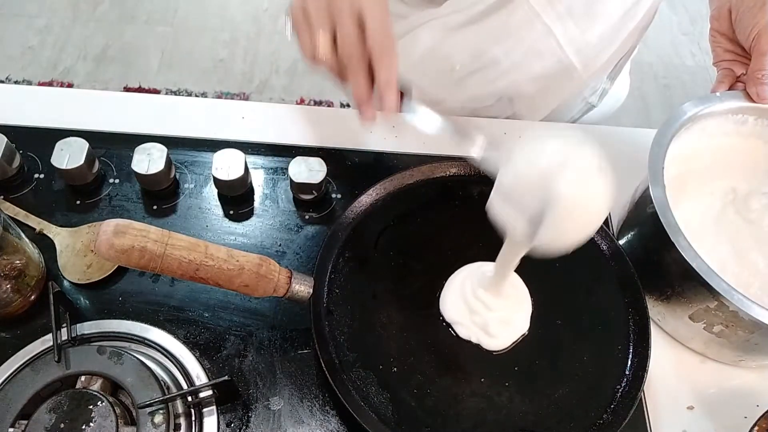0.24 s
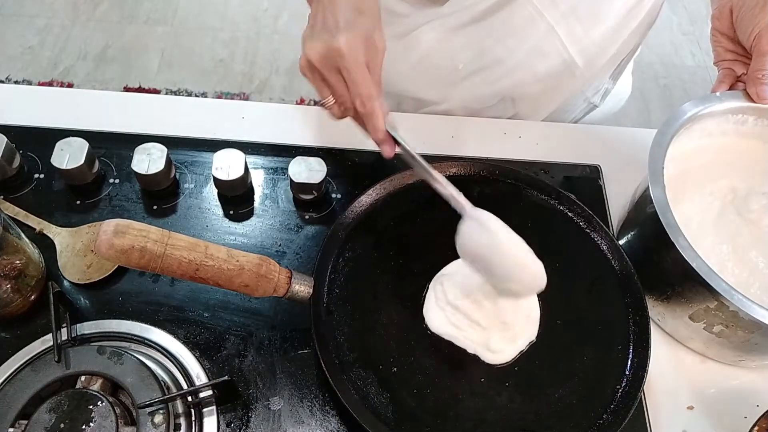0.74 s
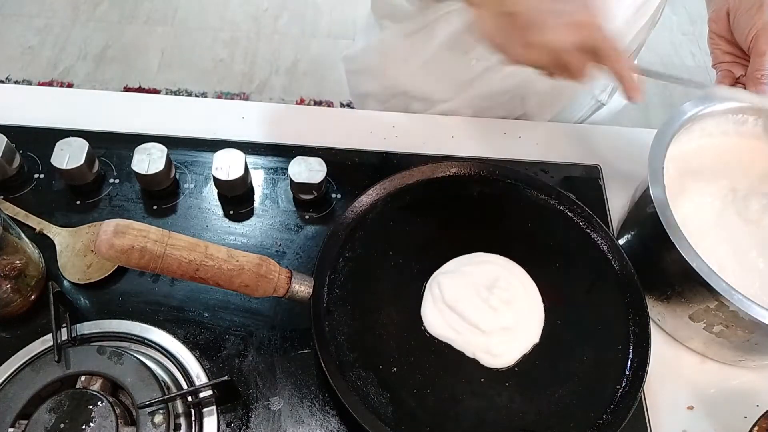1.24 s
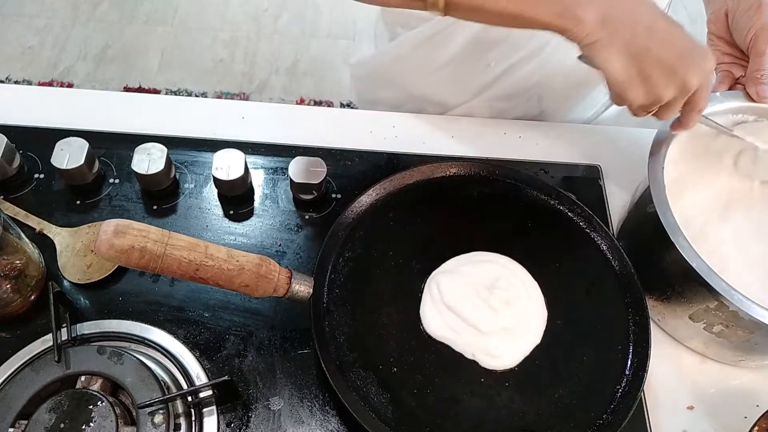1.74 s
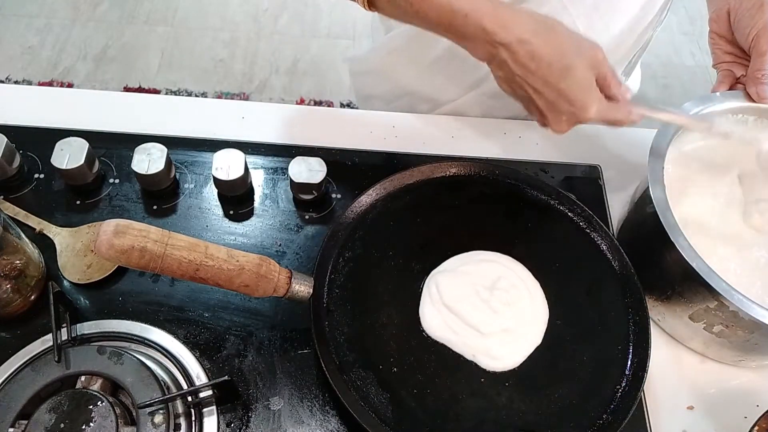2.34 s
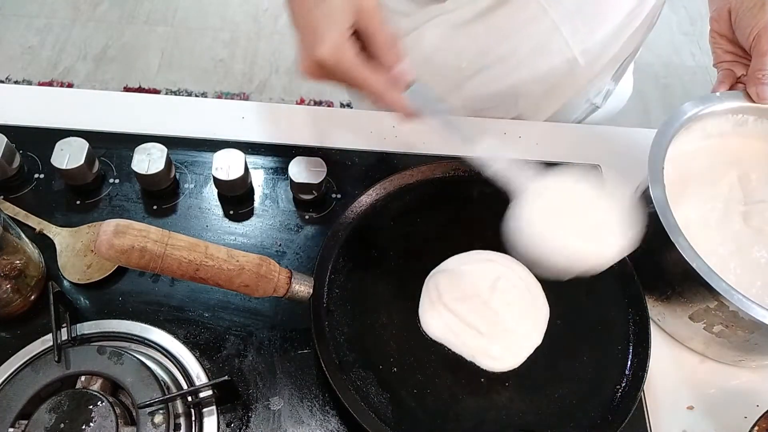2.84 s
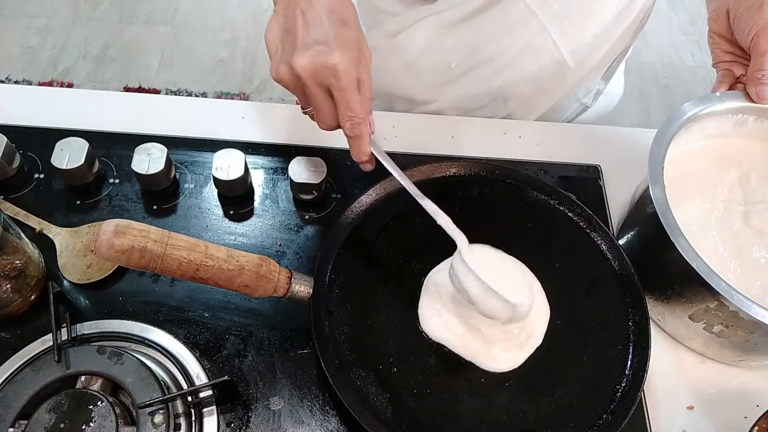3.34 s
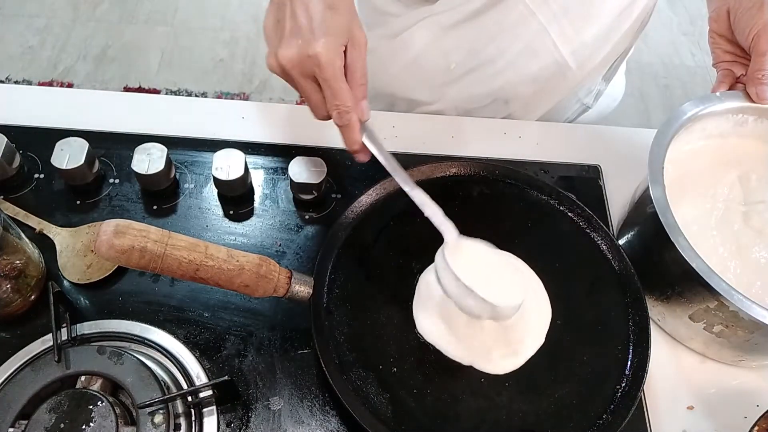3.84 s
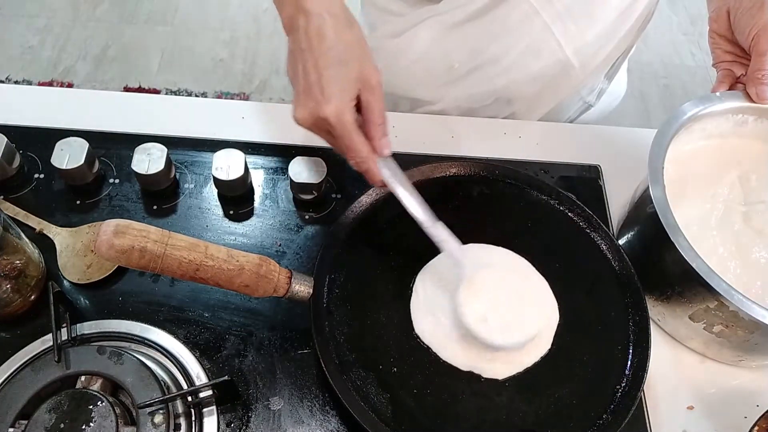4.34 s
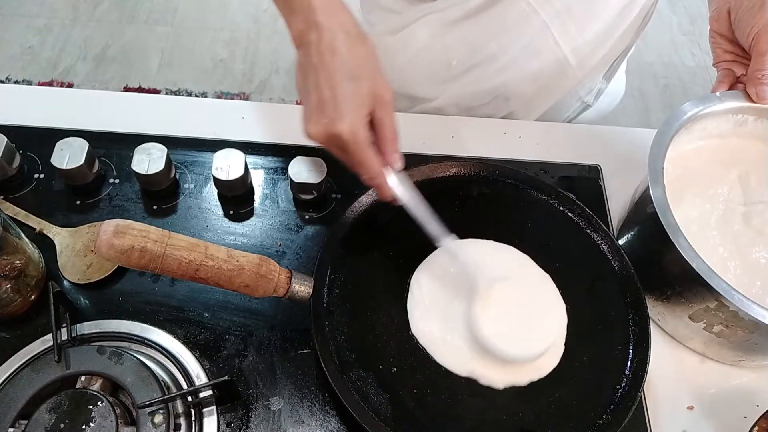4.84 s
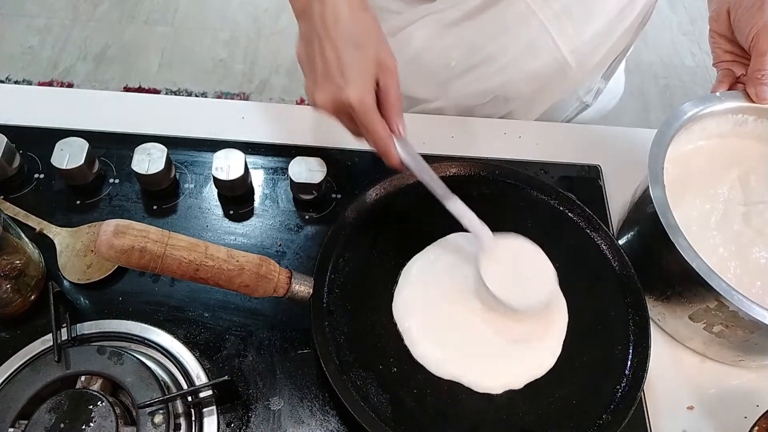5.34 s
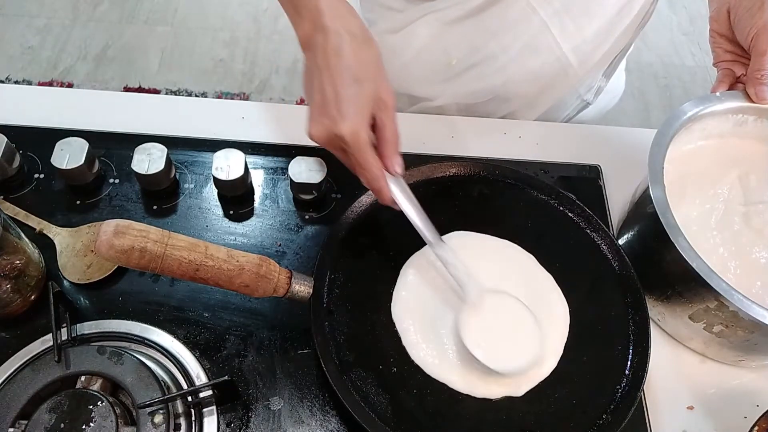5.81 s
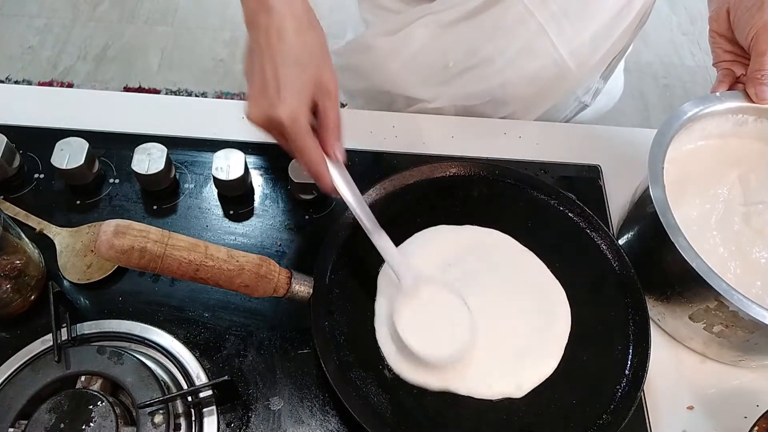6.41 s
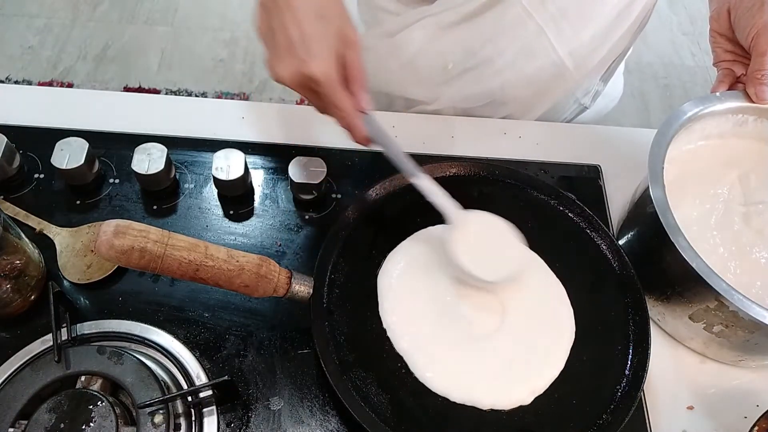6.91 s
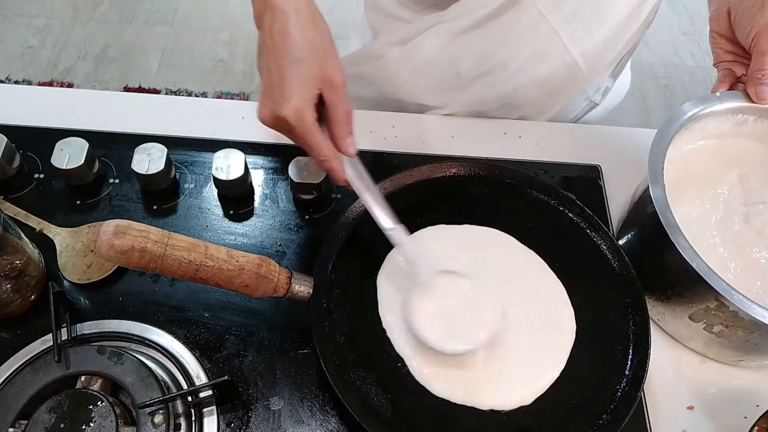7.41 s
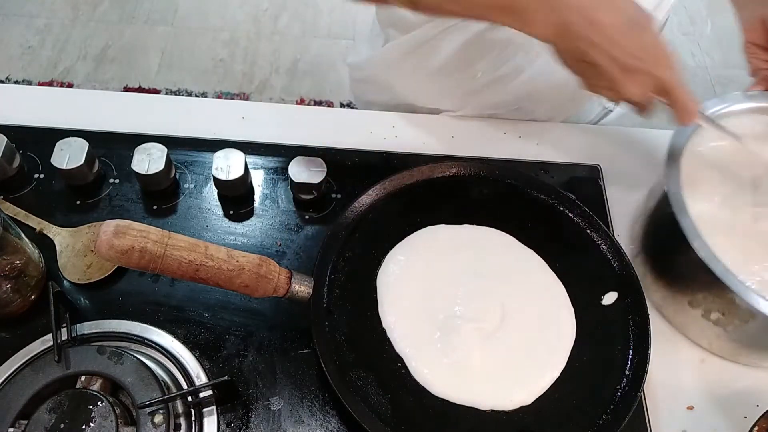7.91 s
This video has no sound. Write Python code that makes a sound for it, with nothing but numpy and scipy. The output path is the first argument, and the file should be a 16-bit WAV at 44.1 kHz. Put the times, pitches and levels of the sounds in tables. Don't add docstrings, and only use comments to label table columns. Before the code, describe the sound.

In a small kitchen, batter lands on a hot griddle. At first there is only low air rumble, a faint flame whistle and a weak fry. From about one second bright pops begin and the sizzle swells into a dense, fizzy spit with irregular crackles. A dull dip in the bowl is barely audible. At the very end the ladle clinks hard and rattles on the steel rim. Close stereo phone pickup, slightly gated highs.

```python
import sys
import numpy as np
from scipy import signal
from scipy.fft import rfft, irfft
from scipy.io import wavfile
from scipy.ndimage import uniform_filter1d

SR = 44100
rng = np.random.default_rng(int(sys.argv[2]) if len(sys.argv) > 2 else 0)


def how_loud(loudness_db):
    steps = np.asarray(loudness_db, float) / 20
    return 10 ** steps


def unload_wav(signal):
    wavfile.write(
        sys.argv[1],
        SR,
        np.round(np.clip(np.atleast_2d(signal).T, -1, 1) * 32767).astype(np.int16),
    )


N = 359856
TIME = np.arange(N) / SR
HZ = np.maximum(np.fft.rfftfreq(N, 1 / SR), 1)
LEFT_RIGHT = np.array([[1], [-1]])

# pitch in Hz, level in dB per Hz.
FRY_TONE = [(140, -59), (230, -41), (462, -18.5), (521, -9), (650, -6.5), (777, -2), (986, 1.5), (1160, -1),
            (1630, 3.5), (6220, -2), (8000, -0.5), (10400, -9.5), (17600, -120)]
# pitch in Hz, level in dB per Hz.
SPIT_TONE = [(3240, -22), (5500, -12), (5810, -7.5), (6250, -11.5), (6950, -5.5), (7540, -14), (8390, -2),
             (9830, 3), (10600, 2.5), (12500, -11), (16200, -53), (22000, -120)]
# pitch in Hz, level in dB per Hz.
TOP_TONE = [(10500, -43), (12000, 2.5), (13500, 4.5), (15000, 1.5), (15850, 9), (16000, -30), (17000, -90)]
# pitch in Hz, level in dB per Hz.
AIR_TONE = [(18, -26), (30, 6.5), (69, -3.5), (204, -0.5), (313, -2), (422, -2.5), (461, 4.5), (523, -9.5),
            (600, 7.5), (780, -34), (1320, -120)]
# pitch in Hz, width in Hz, boost in dB.
IRON_MODES = [(330, 50, 3.5), (467, 23.7, -18.5), (518, 52, 7.5), (629.5, 67, -21.5), (860, 360, 4.5),
              (902, 44, -5.5), (998, 20, 4), (1122, 57, -6), (1246, 62, -1.5), (2140, 135, -5.5),
              (2457, 23, 3.5), (3026, 26, 6.5), (3820, 67, -4.5), (5910, 260, -4)]
# pitch in Hz, side over middle in dB.
SIDE_LEVEL = [(60, 0), (110, -3), (200, -6.5), (380, -4), (700, -8), (1290, -4.5), (2380, -6), (4400, -1.5),
              (8120, 2), (15000, -0.5)]
# pitch in Hz, left over right in dB.
LEAN = [(60, -2), (110, 1), (200, -1), (380, 2), (700, -0.5), (1290, 0), (2380, 0), (4400, 0.5),
        (8120, -2.5), (15000, 7)]
# time in seconds, level in dB.
VIGOUR = [(0.0, -53), (0.49, -43), (0.64, -43.5), (2.13, -31), (2.44, -34), (2.7, -32.5), (2.88, -36),
          (3.32, -34), (3.44, -27.5), (3.61, -38), (3.7, -32.5), (3.77, -36.5), (4.72, -31.5), (4.81, -28),
          (6.36, -29.5), (6.61, -31), (6.87, -28), (7.96, -38)]
# time in seconds, extra fry in dB.
WETNESS_CURVE = [(0, 3), (.3, 7), (1.2, 4.5), (2.0, 0), (3.1, -2.5), (4.3, 2), (5.0, 3), (6.2, 1.5),
                 (7.3, -1), (8.16, -2.5)]
# time in seconds, change in dB, half length in seconds.
STEAM_PUFFS = [(0.31, 2.5, 0.012), (0.494, 2, 0.014), (0.8, 2, 0.053), (1.03, 1, 0.034), (1.243, 2, 0.013),
               (1.262, -7, 0.01), (1.91, 2.5, 0.021), (2.532, -2, 0.03), (2.616, 1, 0.046),
               (2.7, -8, 0.013), (2.71, 7, 0.0097), (2.93, -4, 0.017), (3.041, -5, .008),
               (3.156, 3.5, 0.014), (3.18, -2.5, .008), (3.286, -6, .006), (3.325, -1, .007),
               (3.294, -2.5, 0.028), (3.71, 0, 0.048), (3.832, 2.5, .025), (4.2, 0, 0.025),
               (4.232, 2, 0.022), (4.845, 1, 0.036), (5.96, -1.5, 0.032), (6.13, 0.5, 0.047),
               (6.225, 2.5, 0.083), (7.224, 2.5, 0.047), (7.535, -3, .008), (7.7, -5, 0.0056),
               (8.116, -5, 0.0053), (7.853, -0.5, 0.054), (7.937, 3, 0.072)]
# pitch in Hz, width in Hz, level in dB.
FLAME_WHISTLES = [
    (485, 29, -98),
    (993, 24, -50),
    (7530, 24, -50),
    (8600, 110, -50),
]
# time in seconds, level in dB.
DAMPING = [(0, -5.5), (.4, 0), (1.1, 0.5), (1.6, -14), (2.2, -15), (5, -4), (6.5, -4), (7.1, -6), (7.4, -9),
           (8.16, -8)]
# time in seconds, level in dB.
DRAUGHT = [(0, -1), (.8, 1.5), (1.5, 1.5), (2.1, -0.5), (3.4, 1.5), (4.4, 1), (5.2, 0.5), (6.3, 3),
           (7.2, 2.5), (8.16, 3)]
# start in seconds, peak in
# dB, centre pitch in Hz.
SNAPS = [(0.2975, -30, 3600), (0.303, -29, 4300), (1.1119, -27, 2570), (1.281, -27, 3000),
         (1.2905, -24, 12500), (1.311, -27, 9000), (1.386, -19, 9500), (1.403, -21, 9500),
         (1.523, -19, 9500), (1.61, -19, 9500), (1.637, -32, 1700), (1.661, -24, 13000), (3.138, -19, 9500),
         (3.162, -19, 9000), (3.19, -20, 13000), (3.283, -17.5, 9000), (3.329, -21, 13000),
         (7.543, -20, 9500), (8.1225, -20, 10500), (8.128, -20, 10500), (1.6604, -26, 3000),
         (1.66, -24, 7000), (1.694, -25, 1500), (1.748, -25, 1900), (2.205, -30, 1700), (2.215, -30, 1700),
         (2.7127, -23, 3030), (2.9362, -30, 1470), (3.1896, -28, 3500), (3.229, -33, 1500),
         (3.264, -32, 1900), (3.284, -29, 5000), (3.3283, -27, 4000), (3.391, -21, 4870),
         (7.545, -40, 2500), (7.88, -29, 1500), (7.941, -18, 9000), (7.946, -19, 8500), (7.993, -25, 3000),
         (7.995, -20, 5500), (7.998, -26, 4000), (8.001, -20, 6500), (8.0015, -28, 1200)]
# start in seconds, level in dB, pitch in Hz, time to die by 60 dB in seconds.
SOFT_BLOWS = [
    (0.299, -29, 3050, 0.041),
    (1.642, -43.5, 330, 0.072),
    (7.994, -37, 330, 0.24),
    (8, -42, 188, 0.21),
]
# start in seconds, peak in dB, centre pitch in Hz, left over right in dB.
BIG_POPS = [(0.401, -20.5, 6500, -0.5), (0.549, -18.5, 8300, -3), (0.9821, -24, 9730, -6),
            (1.272, -27, 9890, -1.0), (1.2904, -12, 10100, -2), (1.377, -21, 9980, 0),
            (1.5698, -14.5, 8950, -1.0), (1.648, -30, 11400, 0.0), (1.828, -14, 9720, -2),
            (1.8655, -27, 10200, 1.0), (2.06, -15, 8970, -8), (2.309, -28, 10000, 0.0),
            (2.4572, -24, 10300, 0.5), (2.6957, -14, 10700, 0.0), (2.8498, -21, 10200, -2),
            (2.9387, -11.5, 10000, 4), (3.0517, -17.5, 10200, 6), (3.097, -24, 9350, 0.5),
            (3.1185, -25, 10400, 1), (3.189, -10, 9600, 3), (3.2459, -18, 8970, -2),
            (3.2825, -17, 8750, -4), (3.3286, -12.5, 8900, -2.0), (3.3859, -11.5, 9700, -3),
            (3.6714, -20.5, 10500, 8), (3.7004, -17, 8600, -6), (4.0466, -20, 8840, -6),
            (4.114, -19, 8750, 0.0), (4.2042, -25, 10300, 4), (4.2342, -18, 10500, 8),
            (4.284, -18, 10500, 1.5), (4.4277, -17, 9900, 2), (4.8085, -20, 9340, 0.5),
            (4.8328, -16, 9790, -9), (4.9166, -15, 10300, 1), (5.65, -12, 9740, 1), (5.9757, -12, 10000, 2),
            (6.018, -12, 10200, 0.0), (6.0485, -14, 10800, 0.5), (6.284, -15, 9980, 2),
            (6.6746, -16, 9810, 4), (6.8103, -25, 9910, 1.0), (7.118, -15, 10200, 0.5),
            (7.188, -15, 10600, 1.5), (7.5426, -19, 9600, 1.0), (7.615, -16, 9800, 5),
            (7.708, -14, 10500, -5), (7.727, -16, 10200, 4), (7.7715, -21, 9850, -1.5),
            (7.811, -15, 10600, -2)]
# start in seconds, peak in dB, time for the crack to die by 60 dB in seconds.
RIM_TOUCHES = [(7.986, -15, .006), (7.9927, 0, 0.016), (7.995, -5, 0.0092), (7.996, -1, 0.018),
               (7.998, -2, .015), (8.001, -18, 0.017), (8.0015, -4, .02), (8.014, -18, .015),
               (8.032, -18, 0.022), (8.056, -18, .02), (8.062, -11, .02), (8.09, -21.5, 0.018),
               (8.123, -17, 0.024), (8.1245, -23.5, .02), (8.128, -21, .015), (8.15, -24, .01)]
# pitch in Hz, level in dB, time to die by 60 dB in seconds.
BOWL_MODES = [(2420, -2, 0.011), (3220, -2, 0.011), (4070, -5, 0.017), (5030, -13, 0.035),
              (5230, -10, 0.061), (5520, -13, 0.045), (6150, -9, 0.08), (6500, -7, .06), (6700, -2, 0.045),
              (6860, 3, 0.016), (8200, -8, 0.049), (8860, 1, 0.04), (8970, -5, 0.03), (10500, -2, 0.011)]
# pitch in Hz, half width in Hz, share of the time.
MUTED_BANDS = [(450, 40, .25), (630, 50, .45), (2170, 70, .25), (2720, 80, .3), (3400, 90, .45),
               (3800, 230, .52), (4420, 170, .45), (4660, 90, .42), (5330, 240, .5), (6000, 170, .7),
               (6250, 200, .52), (7240, 120, .55), (7660, 150, .5), (11900, 100, .25), (12580, 250, .46),
               (13300, 300, .52), (13950, 300, .46), (14900, 700, .38), (15900, 250, .6)]
# pitch in Hz, share of the time.
QUIET_TOP_SHARE = [(10500, 0), (11300, .25), (12300, .55), (14200, .7), (15000, .65), (15500, .97)]


def rms_one(x):
    return x / np.sqrt(np.mean(x ** 2) + 1e-20)


def in_time(rows):
    s, value = np.transpose(rows)
    return np.interp(TIME, s, value)


def at_hz(points):
    hz, value = np.transpose(points)
    return np.interp(np.log(HZ), np.log(hz), value)


def drift(rate):
    r = np.exp(-40 * np.pi * rate / SR)
    slow = signal.lfilter([1], [1, -2 * r, r * r], rng.standard_normal(N // 20 + 4002))[4000:]
    return np.interp(np.arange(N) / 20, np.arange(len(slow)), rms_one(slow))


def ring(clicks, hz, t60):
    r, w = how_loud(-60 / (t60 * SR)), 2 * np.pi * hz / SR
    return signal.lfilter([0, np.sin(w)], [1, -2 * r * np.cos(w), r * r], clicks + 1e-18)


def band(x, order, low_hz, high_hz):
    return signal.sosfilt(signal.butter(order, [low_hz, high_hz], "band", fs=SR, output="sos"), x)


def colour(pair, spectrum):
    mid, side = rfft(pair) * how_loud(at_hz(spectrum))
    side = side * how_loud(at_hz(SIDE_LEVEL))
    lean = how_loud(at_hz(LEAN) / 2)
    return rms_one(irfft([(mid + side) * lean, (mid - side) / lean], N))


def crack(t60, low_hz, high_hz, tail_db):
    t = np.arange(2600) / SR
    front, tail = how_loud(-60 * t / 0.0046), how_loud(tail_db - 60 * t / t60)
    burst = band(rng.standard_normal((2, 2600)) * (front + tail), 2, low_hz, min(high_hz, 16000))
    return burst / np.abs(burst).max(axis=1, keepdims=True)


def iron(x):
    rows = []
    for hz, width_hz, db in IRON_MODES:
        w, g = 2 * np.pi * hz / SR, how_loud(db / 2)
        a = np.pi * width_hz / SR
        top = [1 + a * g, -2 * np.cos(w), 1 - a * g]
        bottom = [1 + a / g, -2 * np.cos(w), 1 - a / g]
        rows.append(np.array(top + bottom) / (1 + a / g))
    return signal.sosfilt(rows, x)


def nearby(x, t60, wet_db):
    r = how_loud(-120 / (t60 * SR))
    power = signal.lfilter([0, 1 - r], [1, -r], x ** 2)
    return x + how_loud(wet_db) * np.sqrt(power) * rng.standard_normal(x.shape)


def bursts(per_s, spread_db, clump):
    born = rng.random(N) < per_s * how_loud(clump) / SR
    uneven_db = spread_db * np.minimum(rng.exponential(1, N), 5)
    sizes = how_loud(uneven_db + clump / 2) * born
    return sizes * rng.standard_normal((2, N))


MEAN_BOIL_DB = -33


def boil():
    t = np.arange(0, N + 40, 40) / SR
    puffs = sum(db * np.exp(-((t - s) / half_s) ** 2) for s, db, half_s in STEAM_PUFFS)
    return in_time(VIGOUR) - MEAN_BOIL_DB, np.interp(TIME, t, puffs)


def sizzle():
    vigour, puffs = boil()
    wetness = in_time(WETNESS_CURVE)
    fry_db = -37.5 + 0.57 * vigour + wetness + 0.76 * puffs
    spit_db = MEAN_BOIL_DB + 3 + vigour + puffs
    top_db = -42.5 + vigour + 1.2 * puffs - 0.27 * wetness

    surge = 0.18 * drift(19) + 0.56 * drift(40) + 0.91 * drift(120)
    finest_surge = 0.26 * surge + 0.48 * drift(24)
    coarse_surge = 0.18 * surge + 0.8 * drift(25)
    fine = nearby(bursts(6000, spread_db=2.5, clump=surge), t60=0.085, wet_db=6)
    finest = nearby(bursts(4100, spread_db=2, clump=finest_surge), t60=0.033, wet_db=-16)
    coarse = nearby(bursts(5000, spread_db=0.5, clump=coarse_surge), t60=0.043, wet_db=1.5)

    fry = how_loud(fry_db) * colour(rms_one(coarse) + 0.68 * rms_one(fine), FRY_TONE)
    spit = how_loud(spit_db) * colour(fine, SPIT_TONE)
    top = how_loud(top_db) * colour(rms_one(finest) + 0.53 * rms_one(fine), TOP_TONE)
    no_rumble = signal.butter(3, 130, "high", fs=SR, output="sos")
    return iron(signal.sosfilt(no_rumble, fry + spit + top))


def flame():
    out = 0
    for hz, width_hz, db in FLAME_WHISTLES:
        t60 = 2 / width_hz
        mid, side = ring(ring(rng.standard_normal((2, N)), hz, t60), hz, t60)
        level_db = db + 3 * drift(12)
        if hz > 5000:
            level_db = level_db - 5 * np.minimum(TIME, 1.5)
        out = out + how_loud(level_db) * rms_one(mid + 0.68 * side * LEFT_RIGHT)
    return out


def kitchen_air():
    level_db = -60.5 + in_time(DRAUGHT) + 2.35 * drift(6.7)
    return how_loud(level_db) * colour(rng.standard_normal((2, N)), AIR_TONE)


def ticks():
    out = np.zeros((2, N + 2600))
    for s, db, hz in SNAPS:
        mid, side = crack(0.02, hz / 1.5, hz * 1.5, tail_db=-6)
        out[:, round(s * SR):][:, :2600] += how_loud(db) * (mid + 0.43 * side * LEFT_RIGHT)
    return out[:, :N]


def knocks():
    t, out = np.arange(6000) / SR, np.zeros(N + 6000)
    for s, db, hz, t60 in SOFT_BLOWS:
        soft_start = 1 - np.exp(-t / 0.0012)
        puff = rng.standard_normal(6000) * how_loud(-60 * t / t60) * soft_start
        puff = band(puff, 2, hz / 1.12, hz * 1.32)
        out[round(s * SR):][:6000] += how_loud(db) * puff / np.abs(puff).max()
    return out[:N]


def small_pops(count=70):
    vigour = boil()[0]
    rows = []
    for s in rng.uniform(0.3, 7.95, count):
        size, pitch, place = rng.standard_normal(3)
        db = -22 + vigour[round(s * SR)] / 2 - 4.5 * np.abs(size)
        rows.append((s, db, 9900 + 700 * pitch, 2 * place))
    return rows


def pops():
    out = np.zeros((2, N + 2600))
    for s, db, hz, pan_db in list(BIG_POPS) + small_pops():
        bright = crack(0.056, hz / 1.17, hz * 1.134, tail_db=-14.5)
        dull = crack(0.056, 1200, 10500, tail_db=22)
        gain = how_loud(db + 1.5 + pan_db / 2 * LEFT_RIGHT)
        out[:, round(s * SR):][:, :2600] += gain * (bright + how_loud(-14.5) * dull)
    return out[:, :N]


def clink():
    t = TIME - RIM_TOUCHES[1][0]
    scrape = rng.standard_normal((2, N)) * (rng.random(N) < 0.1) * (t > 0)
    touches = np.zeros((2, N + 2600))
    touches[:, :N] = how_loud(-15) * scrape * np.exp(-((t - 0.045) / 0.071) ** 2)
    for s, db, t60 in RIM_TOUCHES:
        touches[:, round(s * SR):][:, :2600] += how_loud(db) * crack(t60, 3700, 16600, tail_db=-21)
    touches = touches[:, :N]
    direct = band(touches, 3, 5500, 11800)
    body = sum(how_loud(db - 31) * ring(touches, hz, t60) for hz, db, t60 in BOWL_MODES)
    return how_loud(3) * direct + body


def scene():
    damping_db = in_time(DAMPING)
    air = kitchen_air()
    burner = how_loud(damping_db) * flame() + iron(air)
    open_air = how_loud(damping_db - 16) * air
    return sizzle() + burner + open_air + ticks() + knocks() + pops() + clink()


def mute_bands(x):
    hz, s, cells = signal.stft([x[0] + x[1], x[0] - x[1]], SR, nperseg=1024, noverlap=768)
    share = 0.36 * (hz > 3100) * ((hz < 8000) | (hz > 11500))
    bands = [p * np.exp(-((hz - centre) / width) ** 2) for centre, width, p in MUTED_BANDS]
    share = np.maximum(share, np.max(bands, axis=0))[:, None]
    quiet = np.interp(hz, *np.transpose(QUIET_TOP_SHARE))[:, None] * (s < 1.28) * (1 - s / 4)

    level = np.sqrt(np.mean(np.abs(cells[0]) ** 2, axis=0) + 1e-20)
    shut = level < how_loud(3.5) * uniform_filter1d(level, size=41)
    share, quiet = share * shut, quiet * shut

    gain = ((1 - share) * (1 - quiet)) ** -0.3
    for part, bins, alike in ((share, 3, 0.66), (quiet, 7, 0.9)):
        chance = rng.standard_normal((3, len(hz) // bins + 1, len(s) // 4 + 1))
        chance = alike * chance[2] + (1 - alike) * chance[:2]
        chance = rms_one(uniform_filter1d(chance, size=2, axis=2))
        chance = chance.repeat(bins, axis=1).repeat(4, axis=2)[:, :len(hz), :len(s)]
        muted = 1 / (1 + np.exp(-1.7 * chance)) < part
        gain = gain * np.where(muted, 0.02, how_loud(2 * chance * np.sqrt(part)))
    mid, side = signal.istft(cells * gain, SR, nperseg=1024, noverlap=768)[1][:, :N]
    return np.array([mid + side, mid - side]) / 2


def band_limit(x):
    return signal.sosfilt(signal.butter(12, 16800, fs=SR, output="sos"), x)


def record(dry):
    rounded = 0.45 * np.tanh(dry / 0.45)
    top_cut = signal.cheby2(12, 50, 16250, fs=SR, output="sos")
    mix = signal.sosfilt(top_cut, mute_bands(rounded))
    return band_limit(mix)


dry = scene()
out = record(dry)
unload_wav(out)
```